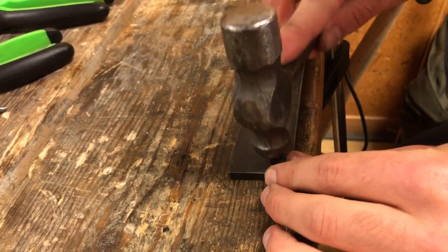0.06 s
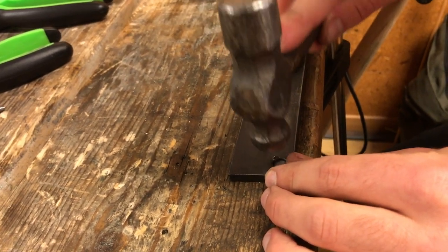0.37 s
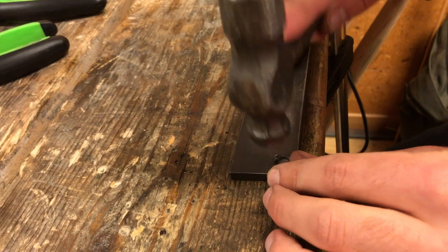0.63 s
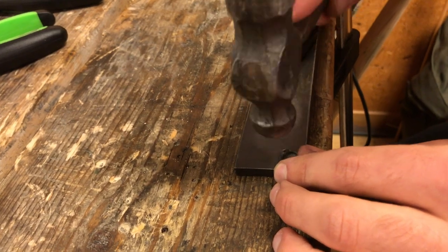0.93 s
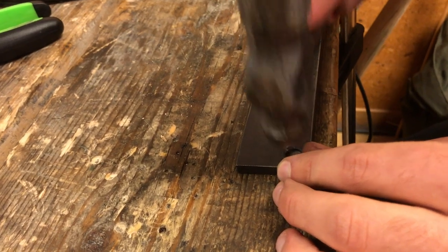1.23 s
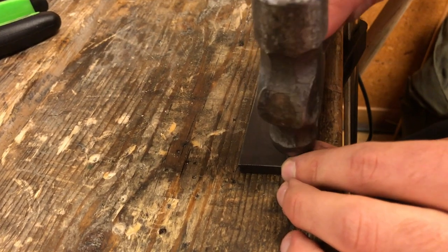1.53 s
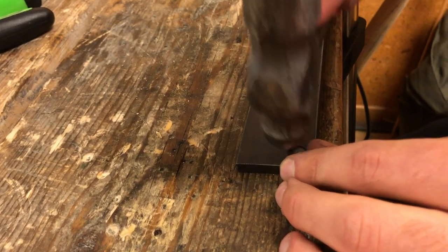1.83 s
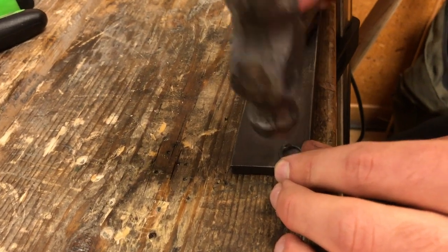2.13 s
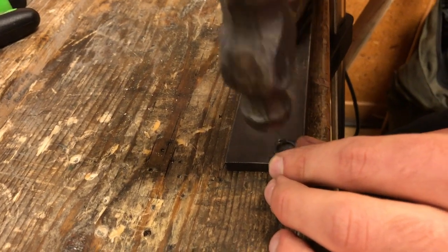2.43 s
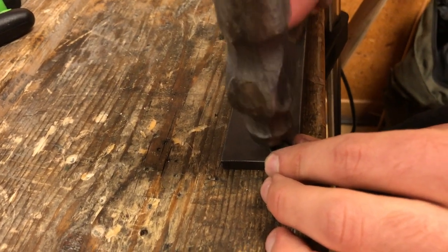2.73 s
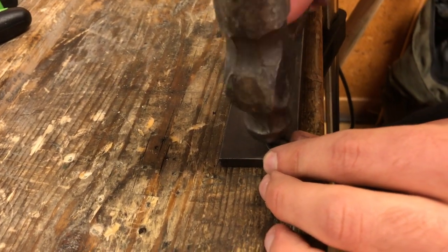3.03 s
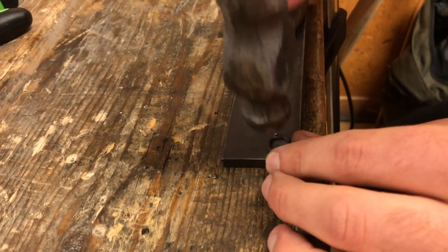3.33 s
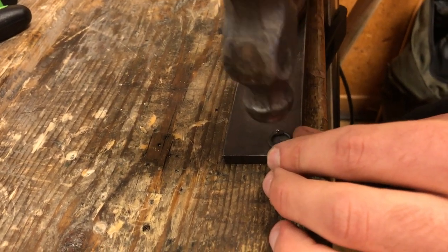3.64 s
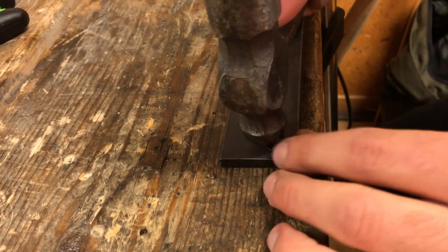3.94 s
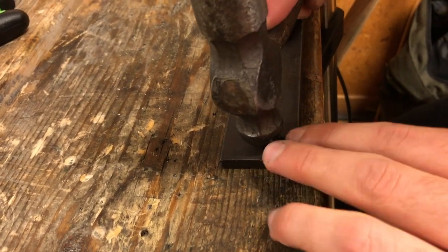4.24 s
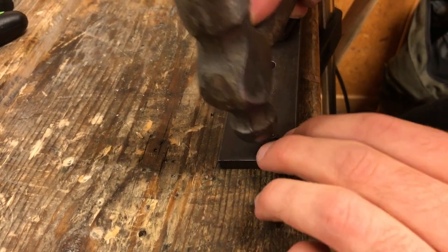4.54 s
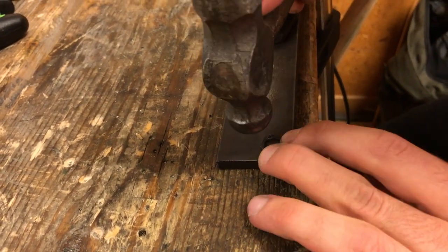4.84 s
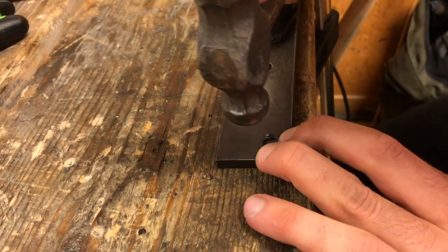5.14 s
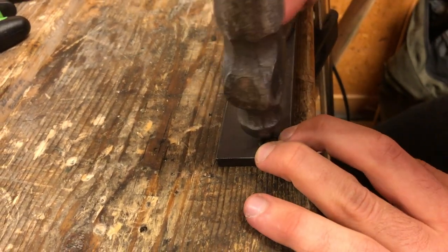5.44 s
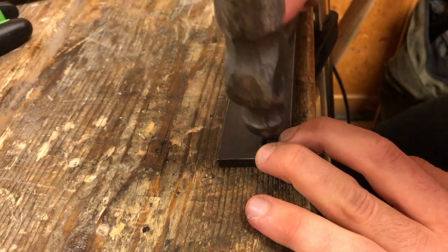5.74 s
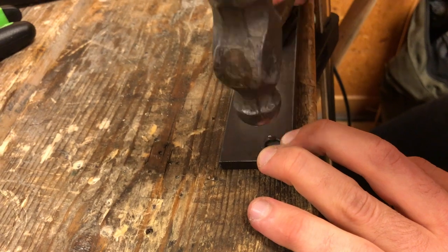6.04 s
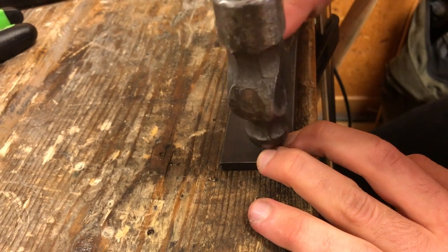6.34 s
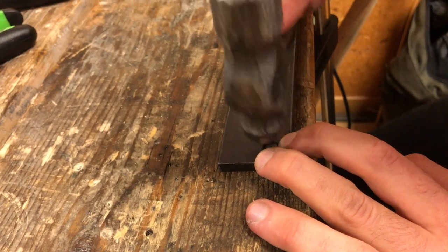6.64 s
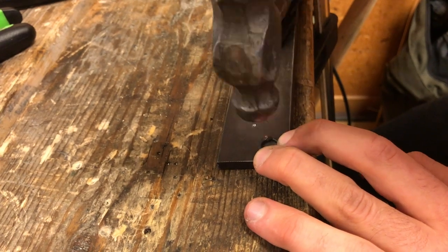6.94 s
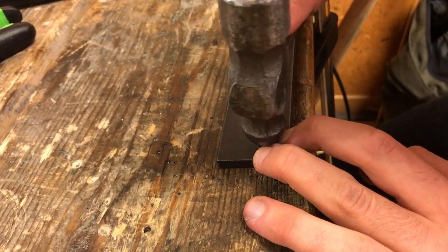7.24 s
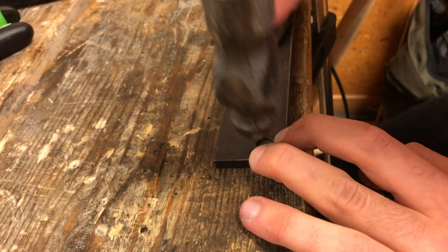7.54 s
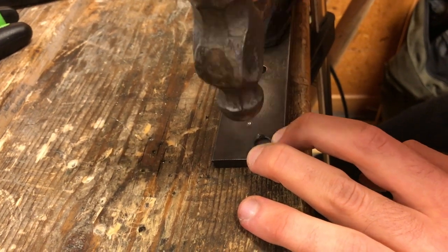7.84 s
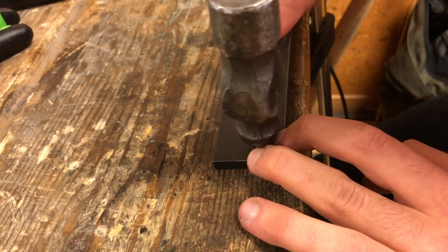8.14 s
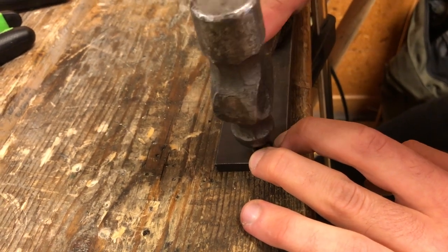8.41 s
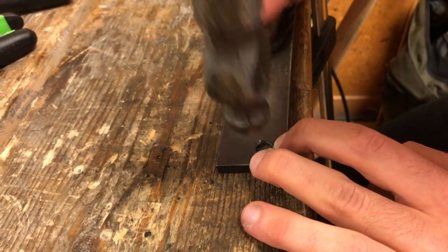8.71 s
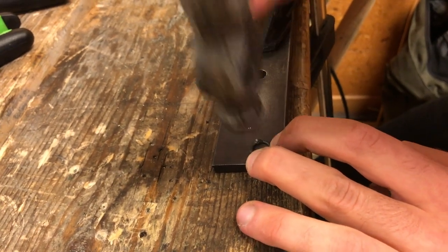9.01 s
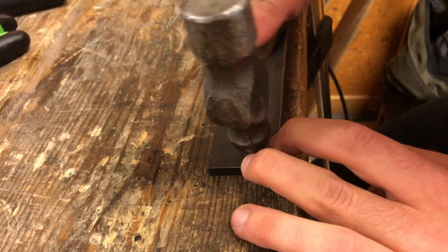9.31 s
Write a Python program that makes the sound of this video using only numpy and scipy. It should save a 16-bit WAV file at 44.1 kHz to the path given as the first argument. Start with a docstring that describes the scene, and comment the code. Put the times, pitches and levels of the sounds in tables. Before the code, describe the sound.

Quick, even hammer blows clack on metal over a wooden bench, in two runs split by a short pause.

```python
"""Hammering on a steel plate

A hammer taps about four times a second on a steel plate lying on a wooden workbench. Each impact
excites damped modes: the plate clacks, the bench booms and the small workshop reverberates.
Now and then the work glances off the plate with a chink. In one pause the fingers slide over the
bench and shift their hold on the work. A fast limiter holds down the peaks."""
import sys
import numpy as np
from scipy import signal
from scipy.fft import rfft, irfft, next_fast_len
from scipy.io import wavfile
from scipy.ndimage import uniform_filter1d, minimum_filter1d

SR = 44100
rng = np.random.default_rng(int(sys.argv[2]) if len(sys.argv) > 2 else 0)


def to_wav(sig):
    """Store sig (one row per channel, or 1-D mono) as 16-bit WAV at the path in sys.argv[1].

    Samples outside -1..1 are clipped; the rate is SR.
    """
    pcm = np.clip(np.atleast_2d(sig), -1, 1) * 32767
    pcm = np.round(pcm).astype(np.int16)
    wavfile.write(sys.argv[1], SR, pcm.T)  # frames by channels


N = 417627
T = np.arange(SR * 3 // 5) / SR  # time axis of one event, t/s

# Levels are relative within each table.
# hammer blows: t/s, level/dB, squareness of contact (0 = tilted and dull, 1 = flat on)
BLOWS = [(-0.135, -0.5, 0.48), (0.105, -0.3, 0.2), (0.3469, 0.6, .8), (0.6134, 0.5, 0.12),
         (0.8584, 0, 0.68), (1.1136, 0.5, 0.65), (1.3615, 0.6, 0.5), (1.606, -0.1, 0.81), (1.8468, 0, 0.34),
         (2.0901, 0.5, 0.71), (2.3429, 0, .3), (2.5878, 0, 0.82), (2.8356, 0.5, .35), (3.0809, 0.6, 0.76),
         (3.3204, -0.2, 0.71), (3.5536, -0.6, .3), (3.8129, -1, 0.66), (5.099, -11, 0), (5.318, -1.6, 0.18),
         (5.5391, 0.4, 0.16), (5.7724, 0.5, 0.057), (5.9857, 0.7, 0.77), (6.2077, 1.5, 0.79),
         (6.4335, -0.5, 1.07), (6.6574, -0.6, .3), (6.8733, -0.5, 0.74), (7.1023, 0.5, 0.74),
         (7.3245, 0, 1), (7.5486, -0.2, 0.074), (7.7702, 0.5, 0.87), (8.0011, 0, 0.68), (8.2257, 0.2, 0.58),
         (8.4603, 0, .6), (8.689, 0.5, .95), (8.9153, 0.5, 0.86), (9.141, 0.4, 0.79), (9.3664, -1, 0)]
# wandering of the work over the plate: t/s, spot (0 = usual place)
SPOT_PATH = [(0, 0.76), (1.6, 0.65), (2.34, -0.21), (3.15, 0.98), (3.8, -0.52), (5.1, -0.52), (5.7, 0.81),
             (9.4, 0.45)]
# freedom of the hammer head to ring in the hand: t/s, level/dB
HEAD_FREEDOM = [(0, -5), (5.8, -3), (6, 4), (8.2, 4), (8.45, -5), (9.4, -1)]
# treble of a blow: f/Hz, level when tilted/dB, gain when square/dB
CONTACT_TREBLE = [(1030, 0, 0), (2720, -1, 7), (4860, -11, 14.5), (5560, -11, 12), (12250, -4.5, -2.5)]
# glancing contacts of work and plate: t/s, level/dB
GLANCES = [(0.8587, -7), (2.0911, -4), (2.8367, -1), (3.5549, 0)]
# soft bumps of the work: t/s, boom level/dB, click level/dB
WORK_BUMPS = [(4.2412, -32, -42), (4.3994, -49, -58), (4.4493, -32.5, -37), (4.481, -43, -33)]
# fingers sliding on wood: t/s, duration/s, level/dB, cut-off f/Hz
FINGER_SLIDES = [(4.044, 0.21, -58, 13900), (4.458, 0.086, -63, 3500), (4.945, .15, -58, 1700)]
# modes of the bench: f/Hz, level/dB, T60/s, gain per unit of spot/dB
BENCH_MODES = [(108.5, -38.5, 0.48, -2.5), (150.9, -22.5, 0.15, -1), (170.9, -36, 0.37, -3.5),
               (214.4, -20.5, 0.14, 0.3), (231.3, -23.5, 0.19, 0), (245.4, -23.5, 0.12, -1.5),
               (288.2, -42, 0.22, 3), (394.6, -21.5, 0.13, -1.55), (410.4, -31, 0.22, 1.7),
               (484.2, -15, 0.061, -0.9), (478, -44, 0.13, -1.5), (529.3, -29.5, 0.12, -1.5),
               (600, -29, 0.14, -1.5), (633, -34.5, 0.24, 0.9), (798.6, -21, 0.11, 0.2),
               (828.7, -32, 0.31, 1), (868.8, -28.5, 0.25, -4.1), (886.7, -25, 0.17, 4),
               (945, -30, 0.012, 2), (931.4, -10, 0.046, -2.8), (1045.4, -18, 0.15, 2),
               (1051.9, -13, 0.062, 1.8), (1276, -23, 0.078, 2.5), (1301, -33.5, 0.14, 5.5),
               (1420, -37, 0.06, 1.3), (1543, -38, 0.19, 7), (1576, -43, 0.3, 4.5), (1601, -43, 0.23, 4.7),
               (1720, -54.5, 0.13, -0.5), (1820, -45.5, 0.033, 6.5)]
# further modes: f/Hz, level/dB, T60/s
PLATE_MODES = [(1567, -20, 0.014), (1915, -35.5, 0.095), (2262, -15, 0.0067), (2260, -44.5, 0.14),
               (2523, -41.5, 0.14), (2940, -19, 0.0025), (3420, -30.5, 0.041), (3447, -45.5, 0.15),
               (3555, -38, 0.12), (4168, -26, 0.02), (4556, -24, 0.013), (5410, -37, 0.02),
               (5660, -38.5, 0.017), (6400, -43.5, 0.014), (6920, -34, 0.009), (9160, -47, 0.013),
               (12600, -44.5, .008)]  # mostly damped by the wood
HEAD_MODES = [(8340, -60, .1), (9168, -62, .08), (11560, -64, .06), (12500, -61, .035), (12732, -55, .09)]  # hammer head
SYMPATHETIC_MODES = [(122, -55, 1.0), (251, -52, 1.1), (479, -52, 1.1), (618, -61, .7)]  # loose things in the shop
# noise spectra: f/Hz, density level/dB
BACKGROUND_SPECTRUM = [(10, -25), (25, -12), (50, 3.5), (120, -2.5), (200, -7), (330, -21), (700, -29),
                       (1400, -26.5), (1950, -29.5), (2600, -27), (4500, -33.5), (10000, -42.5),
                       (16000, -39)]
FRICTION_SPECTRUM = [(100, 6.5), (250, 7.5), (600, -7), (1100, -10), (2500, -22), (6000, -24),
                     (15000, -22.5)]
CHINK_SPECTRUM = [(1500, -30), (3200, -7), (4400, 1), (5500, -5), (6600, -1), (7800, -15), (9300, -19),
                  (11000, -25), (15500, -27)]
CRACK_SPECTRUM = [(1500, -20), (3300, 0.5), (4400, 6), (7000, -11.5), (9200, -12.5), (10500, -28),
                  (15500, -25.5)]  # first contact of steel on steel
CLATTER_SPECTRUM = [(30, -4.5), (100, -25.5), (400, 7.5), (700, 0.5), (950, 2), (1400, 0.5), (2000, -7),
                    (3400, -10.5), (3850, -13), (4400, -12.5), (6000, -18), (8000, -29.5), (9200, -26.5),
                    (10500, -33.5), (15500, -37.5)]
ROOM_SPECTRUM = [(30, -4.5), (70, 5.5), (115, 5.5), (230, 7.5), (330, -2), (500, 1.5), (700, -2.5),
                 (860, 3), (1050, -5.5), (1150, -9.5), (1550, -8.5), (2000, -18), (3400, -18), (4600, -22),
                 (7500, -35.5), (15500, -43.5)]
# decay times: f/Hz, T60/s
CLATTER_DECAY = [(100, 0.2), (1000, 0.19), (4000, 0.14), (12000, 0.15)]
ROOM_DECAY = [(60, 0.53), (250, 0.42), (1000, 0.53), (4000, 0.56), (8000, 0.47), (14000, 0.26)]


def amp(db):
    """Amplitude ratio: a factor of ten for every 20 dB."""
    return 10 ** (np.asarray(db) / 20)


def curve_at(points, hz):
    """Interpolation of (f/Hz, value) points on a logarithmic frequency axis."""
    freqs, values = np.transpose(points)
    return np.interp(np.log(hz + 1), np.log(freqs + 1), values)


def filtered(x, gain):
    """Zero-phase filtering: the spectrum is multiplied by gain(f)."""
    size = next_fast_len(len(x) + 8192)
    return irfft(rfft(x, size) * gain(np.fft.rfftfreq(size, 1 / SR)), size)[:len(x)]


def noise(spectrum, size):
    """Spectral shaping of white noise, normalised to unit rms."""
    x = filtered(rng.standard_normal(size), lambda hz: amp(curve_at(spectrum, hz)))
    return x / x.std()


def add(track, start_s, sound):
    """Superposition of a sound on the track; it may begin before t = 0."""
    start = round(start_s * SR)
    sound = sound[max(-start, 0):]
    part = track[max(start, 0):][:len(sound)]
    part += sound[:len(part)]


def modes(table, build_cycles=0.59):
    """Free vibration: one damped sine per row builds up briefly, neighbours in opposite phase."""
    hz, db, t60 = np.transpose(table)[:3, :, None]
    sign = (-1) ** np.arange(len(hz))[:, None]
    build = 1 - np.exp(-T * hz / build_cycles)
    return sign * build * amp(db - 60 * T / t60) * np.sin(2 * np.pi * hz * T)


def dense_modes(spectrum, decay, rise_s):
    """Modal overlap: countless weak modes merge into noise, each band decaying at its own rate."""
    hz, t, bands = signal.stft(noise(spectrum, len(T)), SR, nperseg=256)
    envelopes = amp(-60 * t / curve_at(decay, hz)[:, None])
    tail = signal.istft(bands * envelopes, SR)[1][:len(T)]
    return tail * (1 - np.exp(-T / rise_s))


def burst(spectrum, t60):
    """A broadband transient: coloured noise under exponential decay."""
    return noise(spectrum, len(T)) * amp(-60 * T / t60)


def workshop_background(level_db=-60):
    """Stationary noise: low room rumble under a faint hiss."""
    return amp(level_db) * noise(BACKGROUND_SPECTRUM, N)


def bench_vibration():
    """Inertia: the modes of the heavy top build up over more cycles than those of the steel."""
    return modes(BENCH_MODES, build_cycles=1.1)


def handling():
    """Weak impacts of the work excite bench and plate; sliding fingers make friction noise."""
    track = np.zeros(N)
    boom = bench_vibration().sum(0)
    for start_s, boom_db, click_db in WORK_BUMPS:
        clatter = amp(-40) * dense_modes(CLATTER_SPECTRUM, CLATTER_DECAY, rise_s=0.00086)
        click = modes(PLATE_MODES).sum(0) + clatter
        add(track, start_s, amp(boom_db) * boom + amp(click_db) * click)
    for start_s, length_s, db, cut_hz in FINGER_SLIDES:
        rub = filtered(noise(FRICTION_SPECTRUM, len(T)), lambda hz: 1 / (1 + (hz / cut_hz) ** 2))
        stroke = np.sqrt(np.abs(np.sin(np.pi * np.minimum(T / length_s, 1))))
        add(track, start_s, amp(db) * stroke * rub / rub.std())
    return track


def loose_plate(start_s=5.099, hz=397, db=-36, t60=0.5):
    """Reduced damping: the light tap after the pause finds the plate loose, and one mode rings on."""
    track = np.zeros(N)
    add(track, start_s, -modes([(hz, db, t60)])[0])
    return track


def chinks():
    """Glancing impact of work on plate: a bright snap, a brief ring and reverberation."""
    track = np.zeros(N)
    for start_s, db in GLANCES:
        snap = amp(-18) * burst(CHINK_SPECTRUM, t60=0.008)
        ring = amp(-37) * burst(CHINK_SPECTRUM, t60=0.07)
        room = amp(-55) * dense_modes(CHINK_SPECTRUM, ROOM_DECAY, rise_s=0.02)
        add(track, start_s, amp(db) * (snap + ring + room))
    return track


def diffuse_response():
    """Dense modes after a blow: a prompt clatter and the slower reverberation of the room."""
    clatter = amp(-24) * dense_modes(CLATTER_SPECTRUM, CLATTER_DECAY, rise_s=0.001)
    room = amp(-30.5) * dense_modes(ROOM_SPECTRUM, ROOM_DECAY, rise_s=0.012)
    return clatter + room


def varied_response(usual, crossover_hz=5000):
    """Partial coherence: low clatter and reverberation repeat; the highest treble varies at random."""
    angle = lambda hz: np.arctan(hz / crossover_hz)
    repeated = filtered(usual, lambda hz: np.cos(angle(hz)))
    fresh = filtered(diffuse_response(), lambda hz: np.sin(angle(hz)))
    return repeated + fresh


def contact_filter(squareness, ripple_db=1.53):
    """Excitation spectrum as gain(f), with random ripple: a squarer contact is shorter, so brighter."""
    ripple_hz = np.geomspace(1100, 15000, num=16)
    ripple = ripple_db * rng.standard_normal(len(ripple_hz))
    ripple[0] = 0  # no ripple in the low range
    treble = [(hz, tilted + squareness * gained) for hz, tilted, gained in CONTACT_TREBLE]
    return lambda hz: amp(curve_at(treble, hz) + np.interp(hz, ripple_hz, ripple))


def modal_sum(vibrations, gains, scatter_db=1.5):
    """Modal superposition, with weights that scatter at random from blow to blow."""
    scatter = amp(scatter_db * rng.standard_normal(len(vibrations)))
    return (gains * scatter) @ vibrations


def hammer(usual_squareness=0.54, head_db_per_squareness=7):
    """Impact excitation: each blow drives bench, plate, head and room; loose things hum in sympathy."""
    track = np.zeros(N)
    bench, plate, head = bench_vibration(), modes(PLATE_MODES), modes(HEAD_MODES)
    plate_hz, head_hz = np.array(PLATE_MODES)[:, 0], np.array(HEAD_MODES)[:, 0]
    bench_db_per_spot = np.array(BENCH_MODES)[:, 3]
    hum = modes(SYMPATHETIC_MODES).sum(0)
    usual_response = diffuse_response()
    for start_s, db, squareness in BLOWS:
        # a squarer blow lands further along and makes the head ring more
        excess = squareness - usual_squareness
        spot = np.interp(start_s, *np.transpose(SPOT_PATH)) + excess
        head_db = np.interp(start_s, *np.transpose(HEAD_FREEDOM)) + head_db_per_squareness * excess
        contact = contact_filter(squareness)
        boom = modal_sum(bench, amp(spot * bench_db_per_spot))
        clack = modal_sum(plate, contact(plate_hz))
        ring = modal_sum(head, amp(head_db) * contact(head_hz))
        diffuse = varied_response(usual_response)
        crack = amp(-27) * burst(CRACK_SPECTRUM, t60=0.0023)
        broadband = filtered(diffuse + crack, contact)
        add(track, start_s, amp(db) * (boom + clack + ring + hum + broadband))
    return track


def scene():
    """Linear superposition of all sources at one point close to the bench."""
    return (hammer() + chinks() + loose_plate() + handling() + workshop_background())[None]


def record(dry, drive_db=0.5, ceiling_db=-9.7, window_samples=45, top_hz=15800):
    """Peak limiting holds the first swings of each blow at one height; a low-pass follows."""
    driven = amp(drive_db) * dry[0]
    needed_gain = np.minimum(1, amp(ceiling_db) / (np.abs(driven) + 1e-9))
    held_gain = minimum_filter1d(needed_gain, size=window_samples)
    smooth_gain = uniform_filter1d(held_gain, size=window_samples)
    return filtered(driven * smooth_gain, lambda hz: hz < top_hz)[None]


dry = scene()
out = record(dry)
to_wav(out)
```